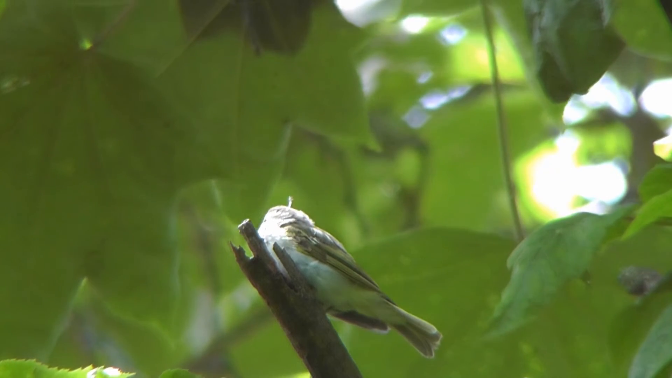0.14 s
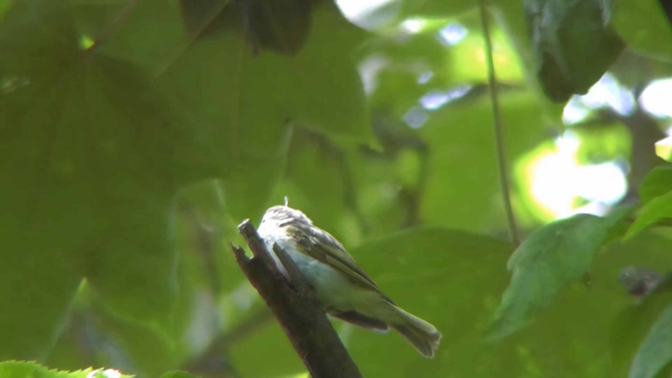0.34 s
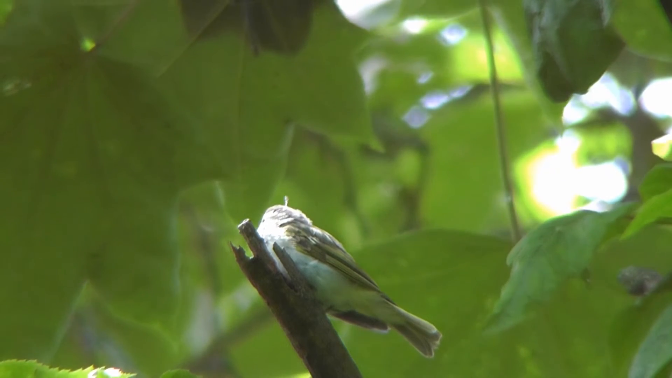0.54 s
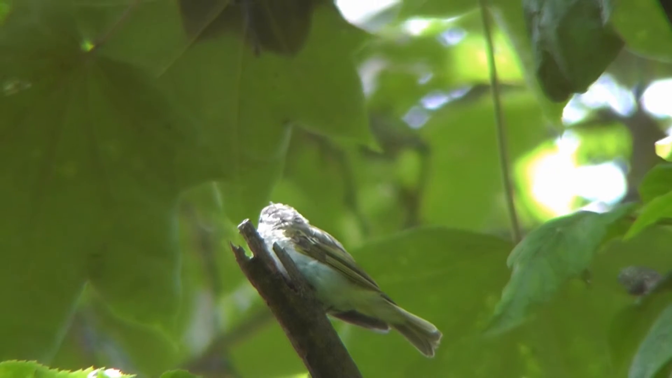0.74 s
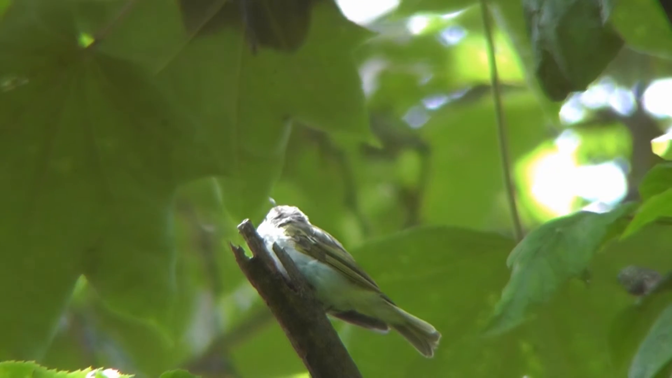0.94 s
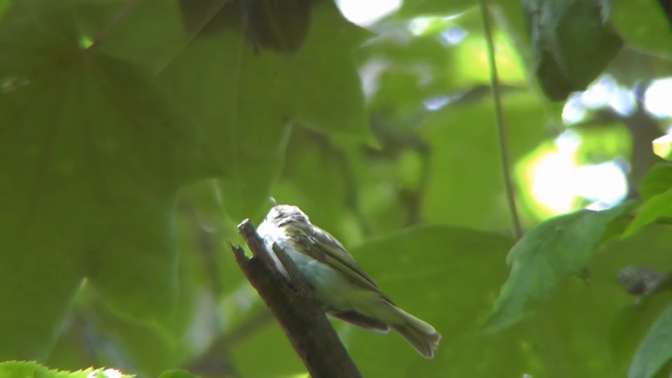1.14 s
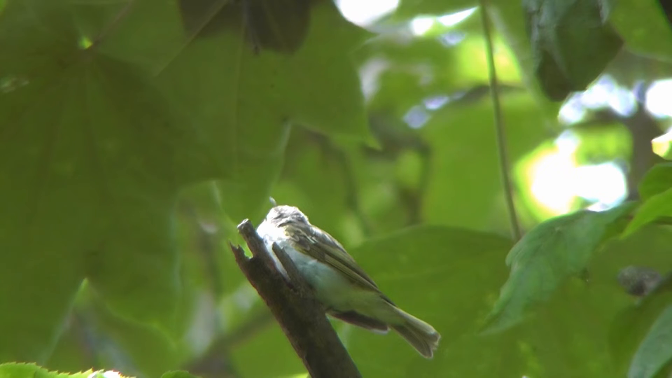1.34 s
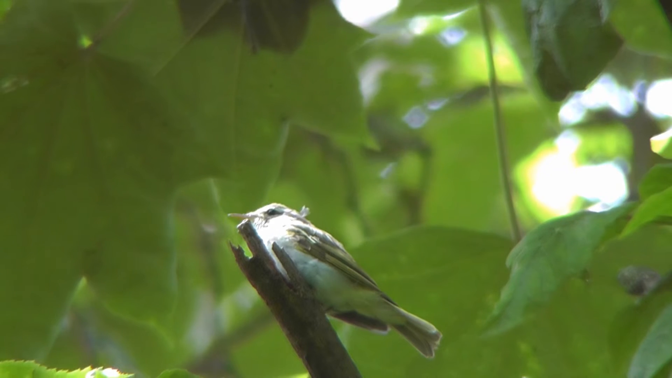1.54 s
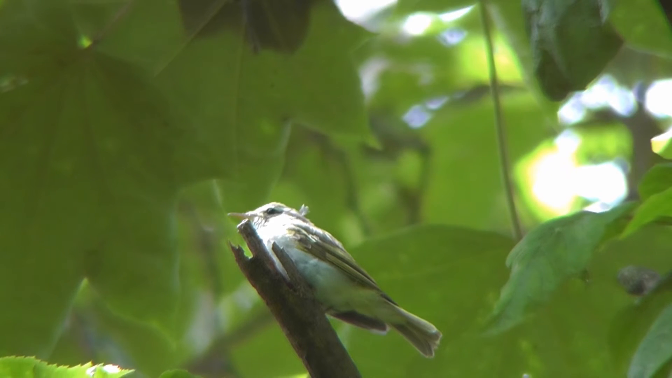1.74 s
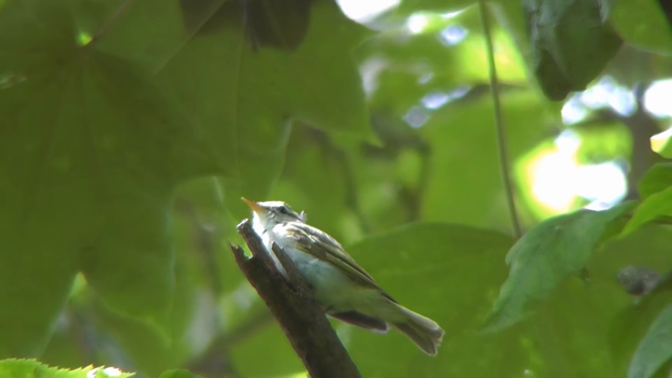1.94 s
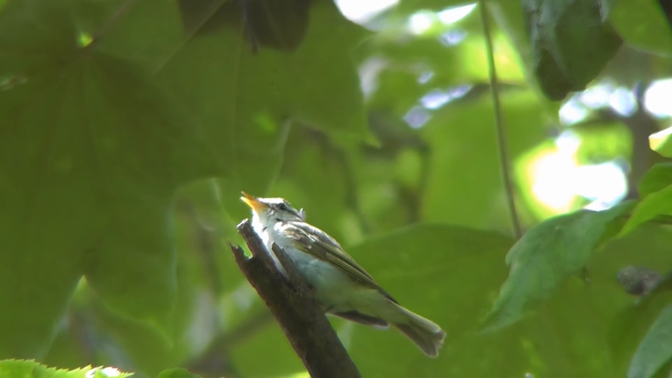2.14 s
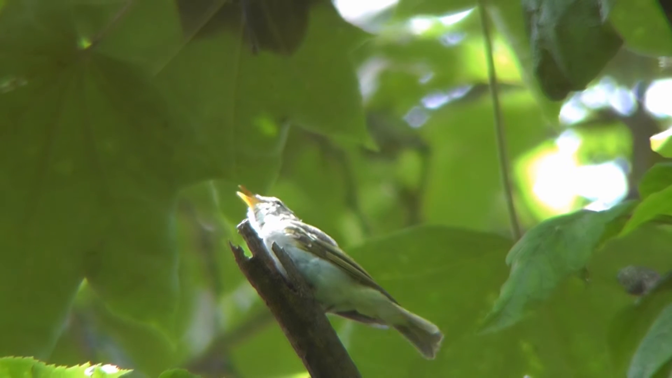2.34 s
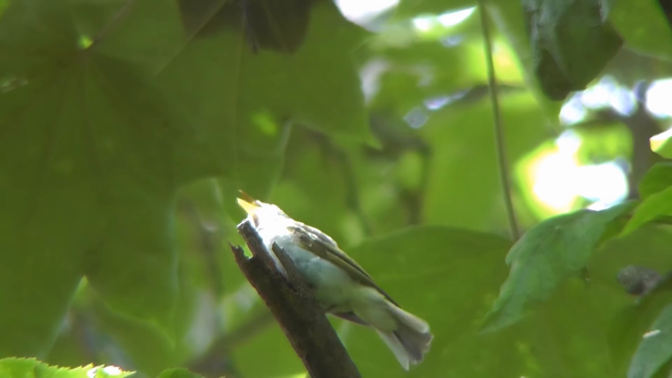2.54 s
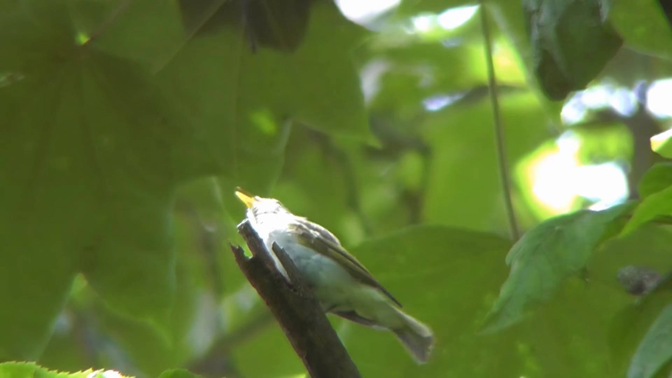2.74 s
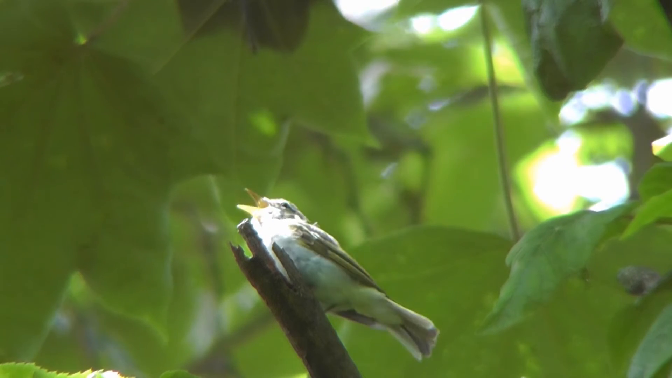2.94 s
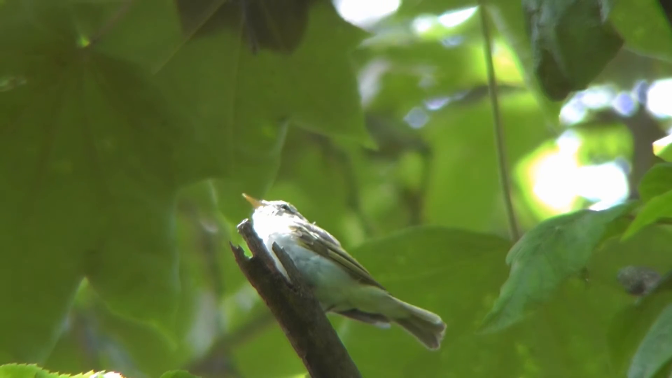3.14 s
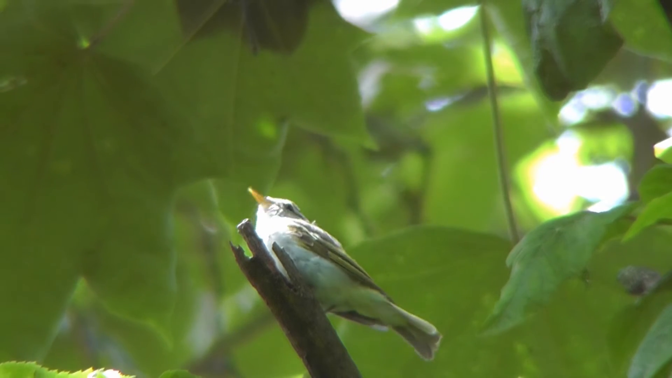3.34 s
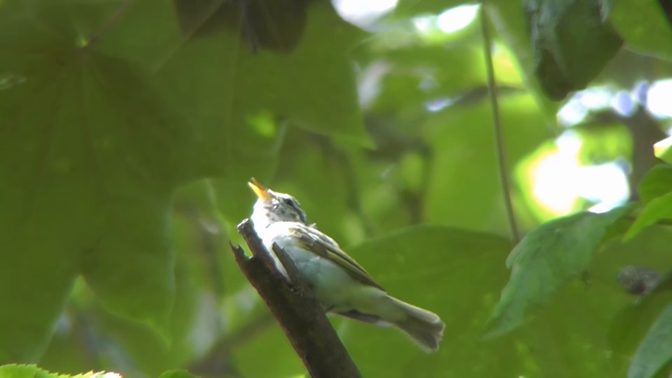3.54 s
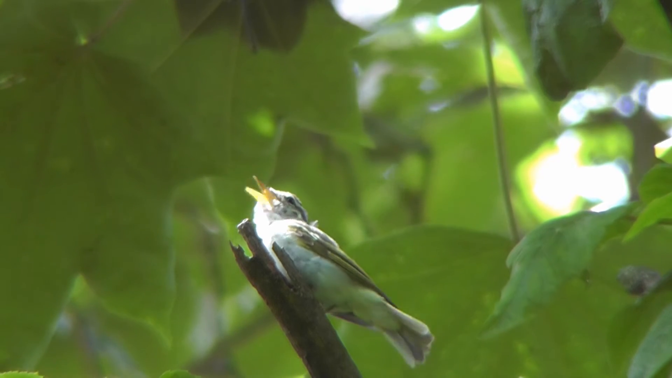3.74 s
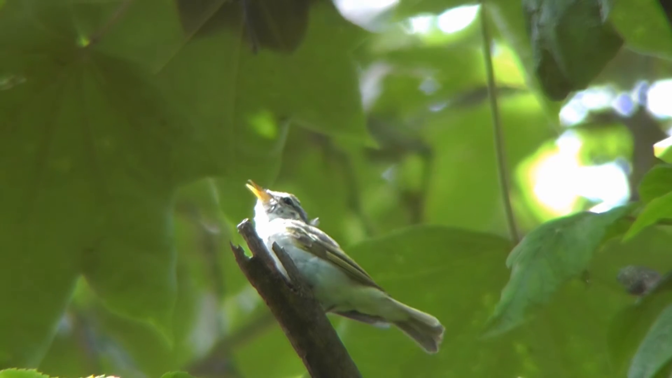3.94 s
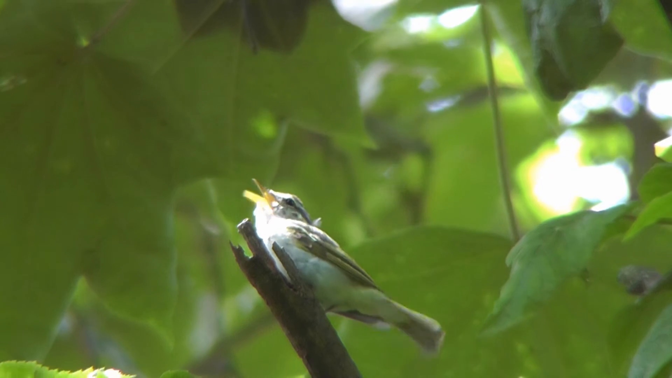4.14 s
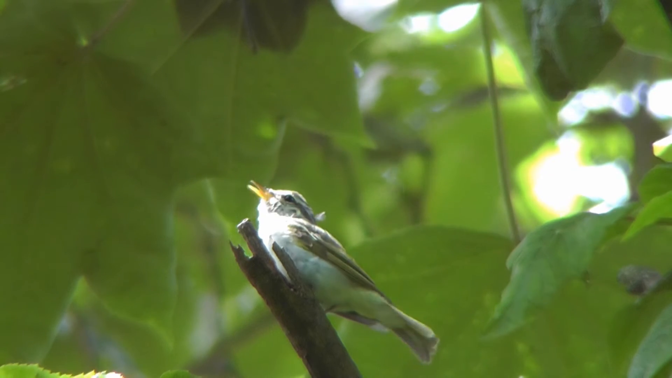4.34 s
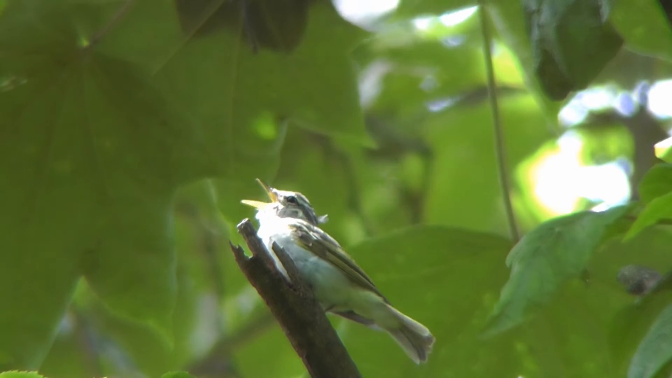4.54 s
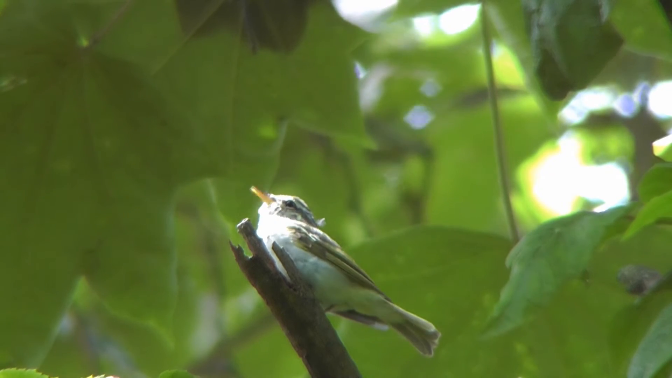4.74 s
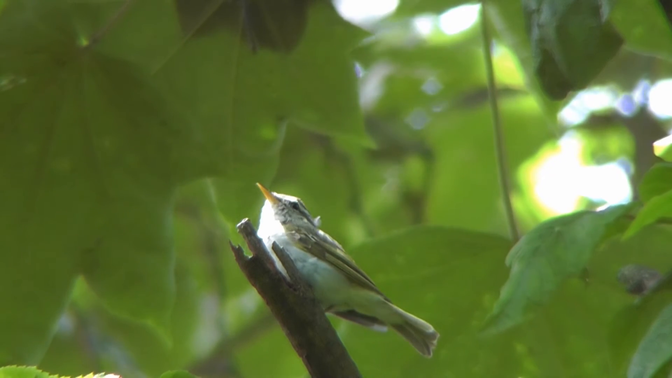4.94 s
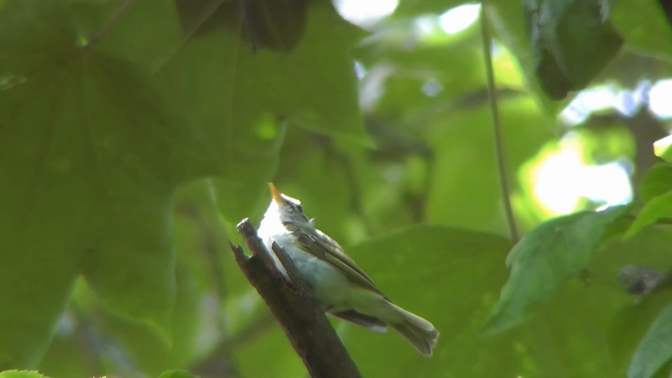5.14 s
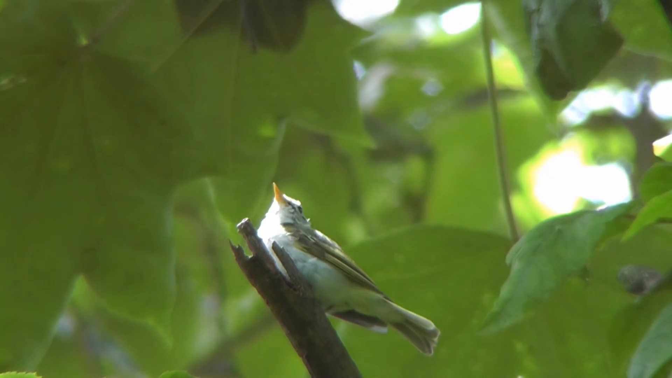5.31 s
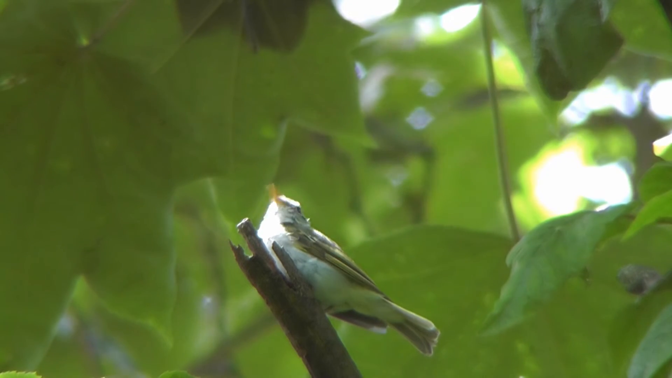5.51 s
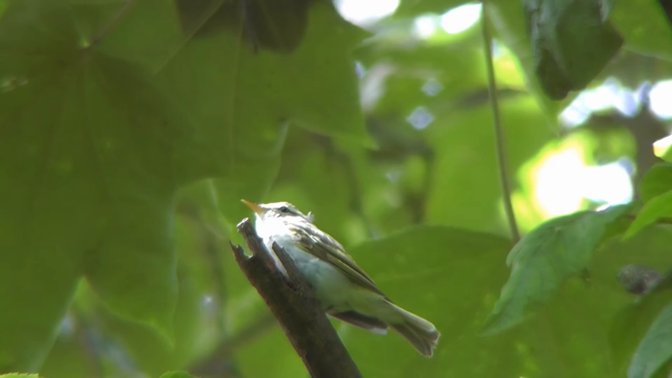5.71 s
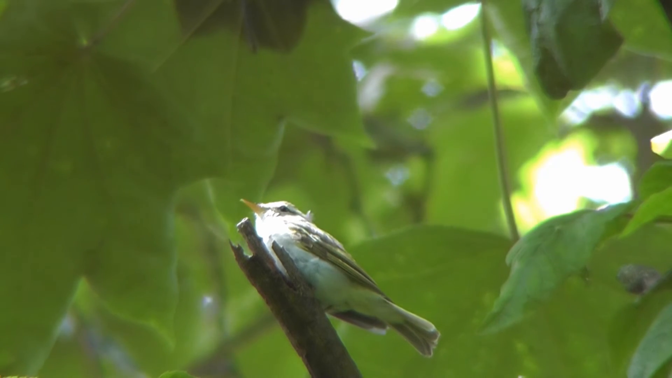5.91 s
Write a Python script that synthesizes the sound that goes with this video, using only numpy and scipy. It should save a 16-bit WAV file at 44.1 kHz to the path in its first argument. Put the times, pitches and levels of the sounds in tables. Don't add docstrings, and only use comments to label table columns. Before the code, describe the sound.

A small microphone, almost mono, picks up a hushed forest. Distant birds chip and slur thinly; a quick dry burst of wingbeats passes. Then a warbler close by bursts into bright, piercing gliding whistles, ending each half with a fast buzzing trill that climbs. A rough crow caw sounds far away between the halves. The song stops into woodland echo, leaving light flutter, little clicking handling creaks, a low gust and faint calls.

```python
import sys
import numpy as np
from scipy import signal
from scipy.fft import rfft, irfft
from scipy.io import wavfile
from scipy.ndimage import uniform_filter1d

SR = 44100
rng = np.random.default_rng(int(sys.argv[2]) if len(sys.argv) > 2 else 0)


def ratio(d):
    e = np.asarray(d, float) / 20
    return 10 ** e


def store_wav(level_fs):
    pcm = np.round(np.clip(np.atleast_2d(level_fs), -1, 1) * 32767)
    wavfile.write(sys.argv[1], SR, pcm.T.astype(np.int16))


N = 267687


def rms_one(x):
    return x / np.sqrt(np.mean(x ** 2) + 1e-20)


def slow_noise(length, size):
    return rms_one(uniform_filter1d(rng.standard_normal(length), size=size))


def coloured(spectrum):
    hz, db = np.transpose(spectrum)
    grid = np.fft.rfftfreq(N, 1 / SR) + 1
    gain = ratio(np.interp(np.log(grid), np.log(hz), db))
    return rms_one(irfft(rfft(rng.standard_normal(N)) * gain, N))


def high_pass(x, hz):
    return signal.sosfilt(signal.butter(4, hz, "high", fs=SR, output="sos"), x)


def low_pass(x, hz):
    return signal.sosfilt(signal.butter(6, hz, fs=SR, output="sos"), x)


def played(rows, round_s):
    s, *columns = np.transpose(rows)
    span = np.arange(round(s[0] * SR), min(round(s[-1] * SR), N))
    size = max(round(round_s * SR), 1)
    *columns, db = [uniform_filter1d(np.interp(span / SR, s, c), size) for c in columns]
    to_edge = np.minimum(span - span[0], (span[-1] - span) / 2)
    fade = np.minimum(to_edge / (.006 * SR), 1)
    return span, columns, np.sqrt(2) * ratio(db) * fade


def whistle(hz, overtone_db):
    phase = 2 * np.pi * np.cumsum(hz) / SR
    flicker = slow_noise(len(hz), 120)
    return np.sin(phase) + ratio(overtone_db) * flicker * np.sin(2 * phase)


def songbirds(notes, round_s, overtone_db):
    out = np.zeros(N)
    for rows in notes:
        span, (hz,), gain = played(rows, round_s)
        out[span] += gain * whistle(hz, overtone_db)
    return out


def syllable(kind, s, top_hz, bottom_hz, tail, level_db):
    rise, start, late, fall, square, creep, loudest, start_db, top_db, slide_db, end_db = kind
    t = np.arange(-rise, tail, .001)
    before, after = np.maximum(-t, 0) / rise, np.maximum(t, 0) / tail
    climb = top_hz * (1 - (1 - start) * np.expm1(-(late * before) ** 1.4) / np.expm1(-late ** 1.4))
    floor_hz = bottom_hz * (1 + creep * (1 - after))
    drop = floor_hz + (top_hz - floor_hz) * np.exp(-(after / fall) ** square)
    loud = tail * min(loudest, .95)
    db = np.interp(t, [-rise, -rise / 2, 0, loud / 2, loud, tail],
                   [start_db, (start_db + top_db) / 2.5, top_db, slide_db, 0, end_db])
    return np.transpose([s + t, np.where(t < 0, climb, drop), level_db + db])


# rise_s, start_pitch (share of top), climb_lateness,
#   fall_time (share of tail), fall_squareness, slow_creep (share of pitch), loudest (share of tail),
#   start_db, top_db, slide_db, end_db
HOOK = (.02, .86, .7, .4, 2.1, -.02, .65, -32, -2.2, -3.5, -5)
SPIKE = (.011, .68, .3, .24, 1.1, .001, .62, -8, -13, -7, -14)
LEAD = (.01, .94, .7, .9, 1.1, .001, .9, -30, -12, -3, .1)
DIVE = (.012, .955, .7, .205, 1.7, .11, .5, -2.5, -1.5, -6, -8)
DROP = (.006, .98, .5, .54, 1.9, .001, .7, -12, -7, -2.5, -1.5)
CHUP = (.04, .72, 2.4, .42, 2.8, .001, .55, -17, 5.5, -3.5, -20)
SWOOP = (.04, .79, .3, .195, 1.45, .055, .42, -8, -2.5, -6, -11)
# kind, top_at_s, top_hz, bottom_hz, tail_s, level_db
PHRASE = [(HOOK, 2.455, 5090, 4270, .046, -20), (SPIKE, 2.505, 7910, 7030, .04, -25),
          (LEAD, 2.675, 5790, 6050, .065, -23.5), (DIVE, 2.749, 6256, 3450, .146, -20.5),
          (HOOK, 2.998, 5017, 4130, .043, -20.5), (CHUP, 3.646, 4330, 2870, .042, -24),
          (SWOOP, 3.72, 5140, 3330, .088, -21), (CHUP, 3.982, 4370, 2700, .042, -23),
          (SWOOP, 4.057, 5050, 3240, .095, -20), (LEAD, 4.245, 5020, 4940, .033, -23.5),
          (SPIKE, 4.288, 7270, 5200, .088, -21), (DROP, 4.431, 5600, 3090, .08, -22)]


def phrase():
    notes, lead = [], np.zeros((0, 3))
    for row in PHRASE:
        rows = syllable(*row)
        rows = np.vstack([lead[lead[:, 0] < rows[0, 0]], rows])
        if row[0] == LEAD:
            lead = rows
        else:
            lead = rows[:0]
            notes.append(rows)
    return notes


def buzz_edges(s, length, level_db, leap):
    u = np.linspace(0, 1, num=40)
    low = 3900 + (5850 - 3900) * u ** 1.15
    high = 7500 - (7500 - 4550) * np.exp(-u / leap)
    top_db = -12 + 11.5 / (1 + np.exp((.53 - u) / .08))
    db = level_db - 16 * np.exp(-u / .07) - 23 * u ** 3.4
    chance = rng.standard_normal((3, len(u)))
    low, high = [low, high] * (1 + .015 * chance[:2])
    return np.transpose([s + length * u, low, high, top_db, db + 1.6 * chance[2]])


# start_s, length_s, swing_hz, level_db, leap (share of the length)
BUZZES = [
    (3.028, .3, 188, -24, .22),
    (4.628, .325, 169.7, -23.5, .34),
]


def buzzes():
    out = np.zeros(N)
    for s, length, swing_hz, level_db, leap in BUZZES:
        span, (low, high, top_db), gain = played(buzz_edges(s, length, level_db, leap), .006)
        swings = np.cumsum(swing_hz * (1 + .03 * slow_noise(len(span), 300))) / SR
        height = (.5 - .5 * np.cos(2 * np.pi * swings)) ** 1.3
        out[span] += gain * ratio(top_db * height) * whistle(low + (high - low) * height, -46)
    return out


def wood(x, direct_db, near_db, near_t60, far_db, far_t60, dull_hz):
    t = np.arange(SR) / SR
    near = ratio(near_db - 60 * t / near_t60) / np.sqrt(near_t60 * SR / np.log(1e6))
    far = ratio(far_db - 60 * t / far_t60) / np.sqrt(far_t60 * SR / np.log(1e6))
    scatter = rng.standard_normal((2, SR))
    dull = signal.sosfilt(signal.butter(2, dull_hz, fs=SR, output="sos"), scatter[1])
    echo = (near * scatter[0] + far * dull) * np.minimum(t / 0.0061, 1)
    return ratio(direct_db) * x + signal.fftconvolve(x, echo)[:N]


# peak_s, peak_db, length_s
STROKES = [(1.56, -40.5, 0.0053), (1.57, -33.5, 0.0047), (1.606, -38.5, 0.0075), (1.622, -37, 0.0094),
           (1.652, -44, 0.0084), (1.668, -39, 0.0047), (1.679, -34, 0.0054), (1.705, -35.5, .007),
           (1.721, -35, 0.009), (1.752, -44, 0.0068), (5.556, -43, 0.023), (5.924, -46.5, 0.0053),
           (5.964, -43.5, 0.0064), (6.04, -45, 0.014)]
# pitch_hz, density_db (per Hz)
WING = [(180, -52), (300, -40), (561, -3.5), (1660, -9), (2130, 2.5), (3290, -5), (5660, -24.5),
        (8350, -22.5), (9500, -40), (11000, -43), (15700, -43)]
# peak_s, peak_db, length_s
FAR_STROKES = [
    (.0, -52, .03),
    (5.235, -53, .02),
    (5.305, -54, 0.034),
    (5.38, -54, 0.027),
    (5.45, -54.5, 0.031),
    (5.52, -52.5, 0.028),
    (5.91, -58, 0.06),
    (6.03, -63, .02),
]
# pitch_hz, density_db (per Hz)
FAR_WING = [(1500, -21), (2600, 0), (3700, -1.5), (5200, -7.5), (6800, -16), (8500, -32), (10000, -42)]
# peak_s, peak_db, length_s
GUSTS = [
    (.2, -61, 0.083),
    (3.5, -59, 0.23),
    (5.6, -59, 0.22),
    (5.95, -69, 0.087),
]
# pitch_hz, density_db (per Hz)
GUST = [(120, -28), (280, -8.5), (400, 2.5), (600, -11), (1300, -7), (2500, -30)]


def wings(strokes, spectrum):
    t, puffs = np.arange(N) / SR, np.zeros(N)
    for s, peak_db, length in strokes:
        ago = (t - s) / max(length, .002) - .6
        puffs += ratio(peak_db - 2) * np.exp(-np.where(ago < 0, 1.4 * ago ** 2, ago))
    return puffs * coloured(spectrum)


# start_s, peak_db, sharpness_db, ring_s
CREAKS = [(5.577, -33.5, -16, 0.0066), (5.594, -33, -8, 0.0022), (5.644, -28, -12, 0.007),
          (5.653, -28.5, -27, 0.0081), (5.661, -33.5, -11.5, 0.01), (5.696, -28, -14.5, 0.0066),
          (5.711, -31, -18, 0.0038), (5.72, -35, -19, 0.0056), (5.735, -41, -24, 0.0071),
          (5.748, -36, -29, .004), (5.756, -32, -20, 0.0043), (5.788, -41, -10, 0.0028)]
# pitch_hz, level_db, ring (share of ring_s)
HOUSING = [(1158, 5, 1.0), (1287, -5.5, .6), (600, -11, 0.64)]
# pitch_hz, level_db, ring (share of ring_s)
HOUSING_TOP = [(2140, -15.5, 0.56), (2850, 2, 0.53), (3520, 0.5, 0.36)]


def housing():
    t, out = np.arange(SR // 20) / SR, np.zeros(N)
    chance = rng.standard_normal((len(CREAKS), 2))
    for (s, peak_db, sharp_db, length), (detune, spread) in zip(CREAKS, chance):
        at = round(s * SR)
        for k, (hz, db, share) in enumerate(HOUSING + HOUSING_TOP):
            shape = np.minimum(t / .001, 1) * np.exp(-(t / (length * share)) ** 1.5)
            upper_db = sharp_db * (k >= len(HOUSING))
            level = ratio(peak_db + db + 1.5 * spread * (k > 0) + upper_db)
            out[at:at + len(t)] += level * shape * np.sin(2 * np.pi * hz * (1 + 0.016 * detune) * t)
    return out


# glide_curve, loudest (share of length), start_db, end_db
SEEP = (9.5, .42, -3, -15)
SLUR = (-.4, .7, -10, -6)
CHIP = (1.2, .45, -4, -7)
# start_s, length_s, from_hz, to_hz, level_db
SEEPS = [
    (1.098, .37, 6200, 4830, -62),
    (1.775, .38, 5980, 5030, -60),
    (5.585, .38, 5800, 4830, -62),
]
SLURS = [
    (.42, .41, 8950, 7300, -64),
    (1.85, .37, 8750, 7350, -58),
    (4.5, .26, 8780, 7500, -53),
    (5.67, .4, 9000, 7300, -67),
    (1.28, .14, 8020, 8270, -63),
    (.41, .14, 6150, 6650, -72),
]
CHIPS = [(.12, .15, 7650, 7850, -73), (.41, .11, 7650, 8250, -62), (.625, .19, 5850, 4800, -63),
         (.915, .1, 8250, 7700, -60), (.93, .1, 6500, 5940, -73), (1.15, .11, 8600, 7600, -69),
         (1.43, .09, 8780, 8460, -74), (1.64, .08, 8250, 7900, -61), (2.02, .1, 4830, 4750, -71),
         (2.34, .11, 5800, 5100, -66), (3.52, .1, 5700, 4970, -58), (4.2, .045, 6100, 5400, -57),
         (4.575, .065, 7700, 8050, -52), (4.58, .12, 6600, 6800, -60)]


def far_call(kind, s, length, from_hz, to_hz, level_db):
    curve, loudest, start_db, end_db = kind
    u = np.linspace(0, 1, num=40)
    hz = from_hz + (to_hz - from_hz) * np.expm1(-curve * u) / np.expm1(-curve)
    hz = hz * (1 + .008 * rng.standard_normal(len(u)))
    db = level_db + np.interp(u, [0, loudest, 1], [start_db, 0, end_db])
    return np.transpose([s + length * u, hz, db])


def far_songbirds():
    kinds = [(SEEP, SEEPS), (SLUR, SLURS), (CHIP, CHIPS)]
    calls = [far_call(kind, *row) for kind, rows in kinds for row in rows]
    return songbirds(calls, .008, -60)


def ring(clicks, hz, t60):
    r, w = ratio(-60 / (t60 * SR)), 2 * np.pi * hz / SR
    return signal.lfilter([0, np.sin(w)], [1, -2 * r * np.cos(w), r * r], clicks + 1e-18)


# time_s, pulse_hz, level_db
CAW = [
    (3.55, 191.9, -61.5),
    (3.6, 195.2, -53.5),
    (3.68, 191.1, -46),
    (3.76, 176.8, -49),
    (3.86, 162.9, -49.5),
    (3.95, 147.1, -53),
    (4.02, 131.7, -58),
]
# pitch_hz, width_hz, level_db
CROW_THROAT = [(1300, 460, -9.5), (1780, 620, -9.5), (2050, 510, -11.5)]


def crow():
    span, (rate_hz,), gain = played(CAW, 0.028)
    turns = np.cumsum(rate_hz * (1 + .012 * slow_noise(len(span), 400))) / SR
    pulses = np.diff(np.floor(turns), prepend=0)
    voice = np.zeros(len(span))
    for k, (hz, width, db) in enumerate(CROW_THROAT):
        voice += (-1) ** k * ratio(db) * ring(pulses, hz, np.log(1000) / (np.pi * width))
    out = np.zeros(N)
    out[span] = gain * rms_one(voice)
    return out


# pitch_hz, density_db (per Hz)
AIR = [(18, -66.5), (30, -50.5), (93, -17), (410, -3.5), (600, 0), (1330, -0.5), (2030, 2.5), (3490, -8.5),
       (4300, -15.5), (6000, -20.5), (8200, -17.5), (9000, -29), (10200, -37), (15700, -62.5)]


def air():
    return ratio(-52.5) * coloured(AIR)


def side_air():
    spectrum = [(30, -25), (100, -6), (300, 0), (700, -2), (2000, -10), (9000, -24), (16000, -30)]
    return ratio(-92) * coloured(spectrum)


def scene():
    voice = high_pass(low_pass(songbirds(phrase(), .003, -44) + buzzes(), 8200), 1500)
    song = wood(voice, -3.5, -2.5, 0.098, -7, 0.56, 6150)
    flutter = wings(STROKES, WING) + wings(FAR_STROKES, FAR_WING) + wings(GUSTS, GUST)
    creaks = low_pass(high_pass(housing(), 515), 5200)
    far = wood(far_songbirds(), -13, -3, .3, -1, .7, 9000)
    caw = wood(high_pass(crow(), 850), -1, -4, .25, -6, .7, 4000)
    centre = far + caw + flutter + creaks + air()
    return centre + song * ratio([[-.6], [.6]]) + side_air() * [[1], [-1]]


# pitch_hz, width_hz, level_db
PORTS = [(896, 900, -16), (1777, 240, -33), (2400, 360, -28.5), (3060, 280, -46.5), (2580, 280, -2),
         (3534, 290, 2), (4300, 230, 0), (6100, 170, -2.5), (6840, 570, 8.5), (7040, 290, -7.5)]


def ports(x):
    for hz, width, db in PORTS:
        w, a = 2 * np.pi * hz / SR, np.pi * width / SR
        scale = ratio(min(db, 0))
        top, bottom = a * ratio(max(db, 0)) * scale, a * ratio(max(-db, 0)) * scale
        middle = -2 * np.cos(w)
        x = signal.lfilter([1 + top, middle, 1 - top], [1 + bottom, middle, 1 - bottom], x)
    return x


# pitch_hz, density_db (per Hz)
GRIT = [(3000, -34), (8000, 10), (10000, -4), (15700, -3)]
# pitch_hz, density_db (per Hz)
HAZE = [(6500, -28.5), (7800, 1), (8800, -2), (9600, -30.5)]


def grit(x):
    power = high_pass(x, 3000) ** 2
    quick = np.sqrt(uniform_filter1d(power, size=300) + 1e-14)
    slow = np.sqrt(uniform_filter1d(power, size=1500) + 1e-14)
    room = 1 / (1 + (slow / ratio(-38.5)) ** 9.4)
    top = ratio(-19) * quick ** 1.1 * room * coloured(GRIT)
    return top + ratio(-40) * slow * coloured(HAZE)


def top_cut(x):
    return signal.sosfilt(signal.butter(12, 15740, fs=SR, output="sos"), x)


def record(dry):
    heard = ports(dry)
    mix = heard + grit(heard[0])
    return top_cut(mix)


dry = scene()
out = record(dry)
store_wav(out)
```